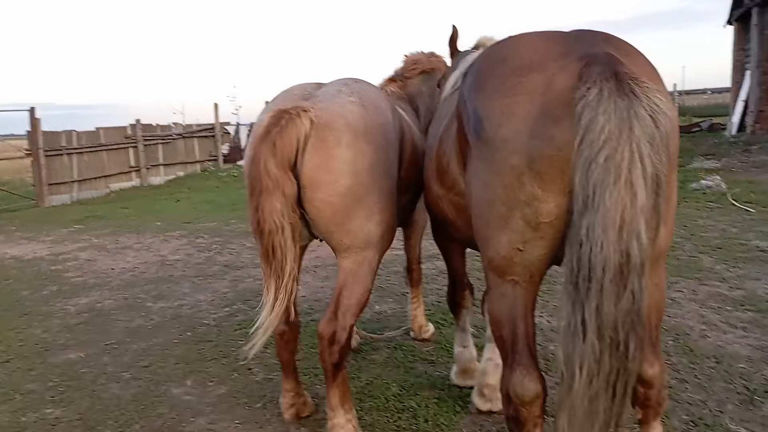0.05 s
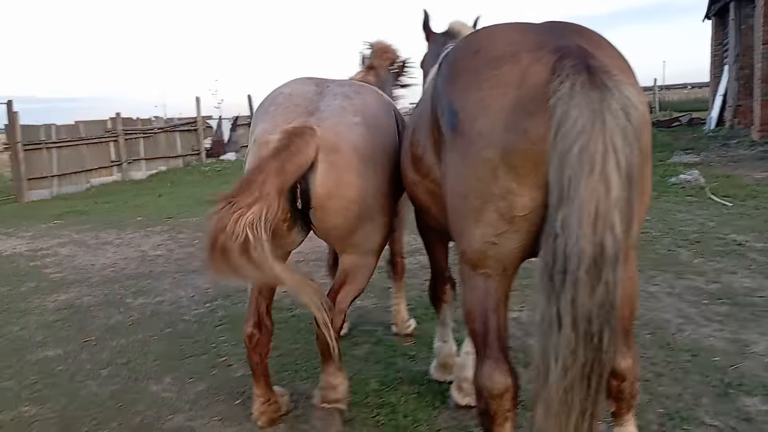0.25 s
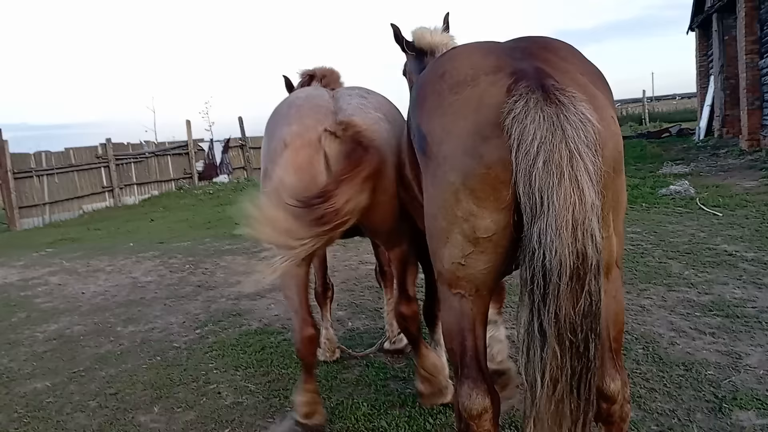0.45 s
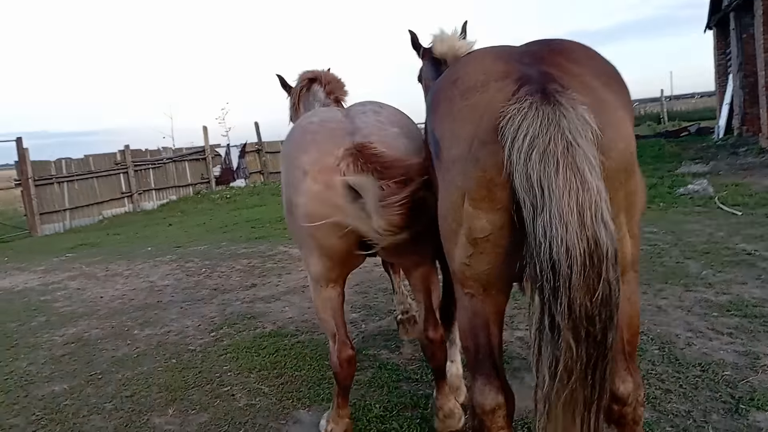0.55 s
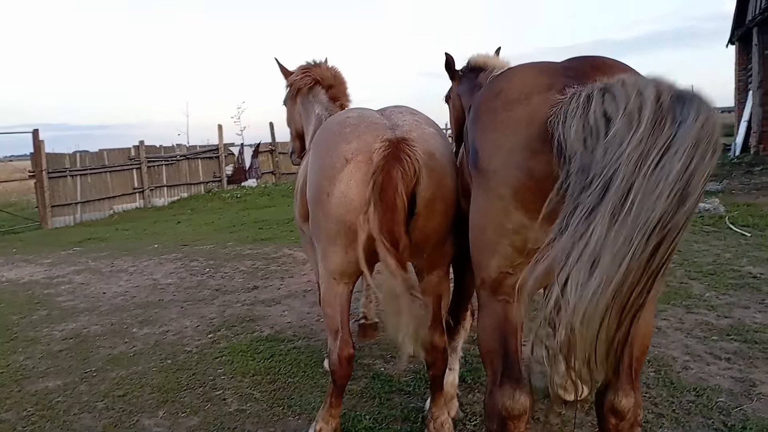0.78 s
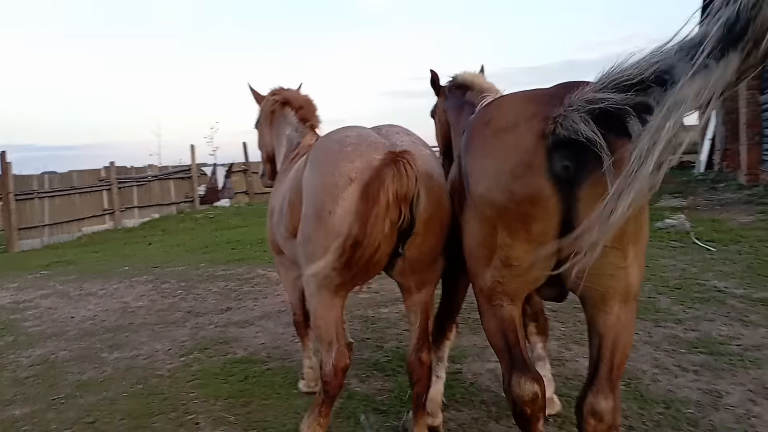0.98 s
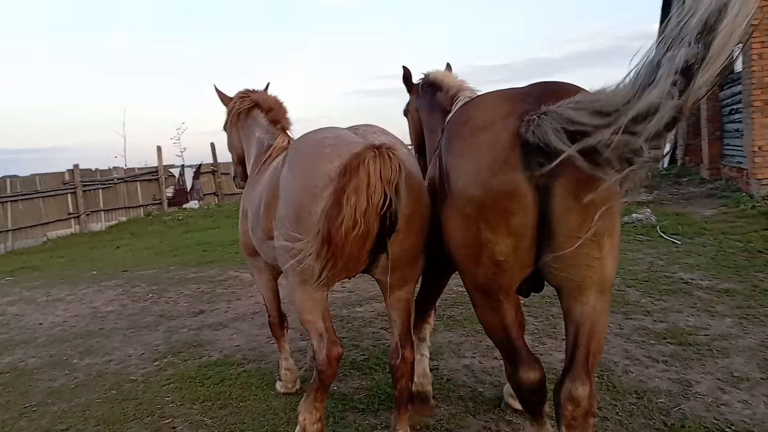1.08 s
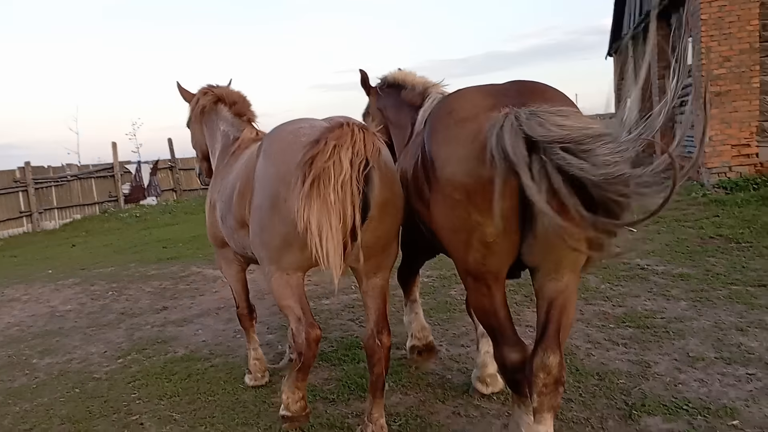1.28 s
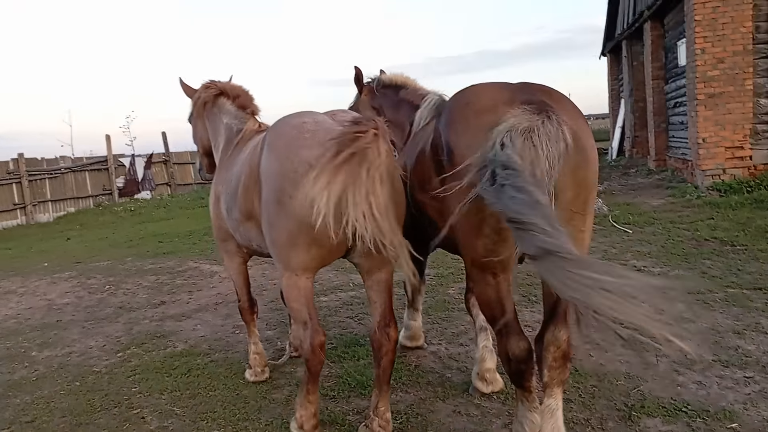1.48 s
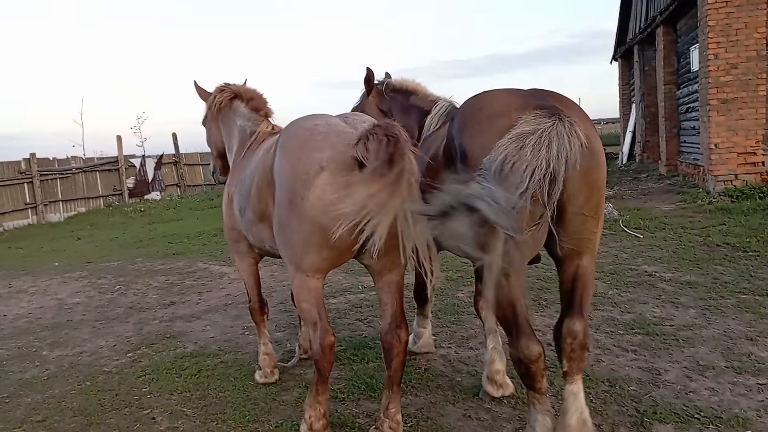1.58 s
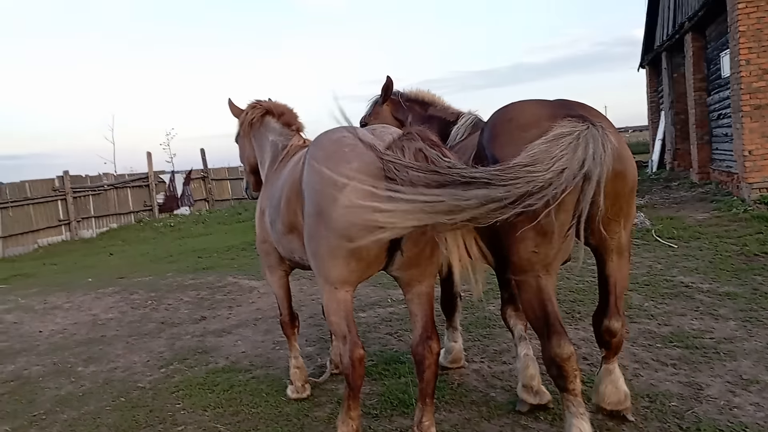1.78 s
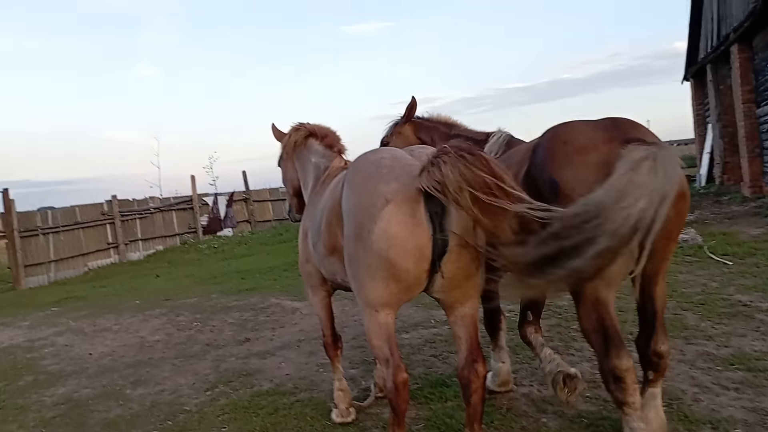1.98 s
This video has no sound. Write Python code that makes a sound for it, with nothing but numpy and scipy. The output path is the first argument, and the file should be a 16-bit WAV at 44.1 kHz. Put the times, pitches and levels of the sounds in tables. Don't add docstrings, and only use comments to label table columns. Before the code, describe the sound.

A horse squeals from about 0.12 to 0.7 seconds: a muffled whimper opens into a clear cry, loudest near 0.35 with a short growl, then jumps higher around 0.5 and breaks off, echoing from the right. Dull hooves thud on turf at 0.3-0.7, twigs tick near 0.85, a faint sigh falls at 0.9. Then quiet rumble, thin rustles near 1.5, soft steps at 1.6 and 2.0.

```python
import sys
import numpy as np
from scipy import signal
from scipy.fft import rfft, irfft
from scipy.io import wavfile

SR = 44100
rng = np.random.default_rng(int(sys.argv[2]) if len(sys.argv) > 2 else 0)


def dump_mix(stems):
    frames = np.atleast_2d(stems).T
    limited = np.clip(frames, -1, 1)
    pcm = np.round(limited * 32767).astype(np.int16)
    wavfile.write(sys.argv[1], SR, pcm)


def natural_amplitude(level_db):
    exponent = np.asarray(level_db, float) / 20
    return 10 ** exponent


N = 90404

# frequency in Hz, density in dB per Hz.
COUNTRY_RUMBLE = [(18, -58), (30, -9.5), (87, -1.5), (173, -8.5), (209, -7.5), (410, -22.5), (450, -10),
                  (985, -19.5), (2000, -25), (2500, -40.5), (5720, -120)]
# frequency in Hz, density in dB per Hz.
TREBLE_AIR = [(2400, -8), (3500, -8), (6500, -16.5), (8000, -7.5), (10500, -6), (12000, -20), (15700, -11)]
# frequency in Hz, width in Hz, level in dB.
FARM_DRONES = [(100, 73, -58), (207.8, 27.6, -58.5), (405.3, 28, -64.5), (523, 95, -61.5)]
# delay in seconds, level in dB, left-right difference in dB.
WALL_ECHOES = [
    (.088, 5, -11),
    (.06, -9, -5),
    (.172, -21, -8),
]
# start in seconds, rise in seconds, fall in seconds, level in dB,
# crisp top relative to level in dB.
RUSTLES = [(0.024, 0.0056, 0.0043, -64.5, -15), (.08, 0.0052, 0.25, -69.5, -2),
           (.21, 0.024, 0.026, -56.5, -8), (0.294, 0.029, 0.11, -48, -34), (0.576, 0.02, 0.015, -51, -21),
           (0.671, 0.028, 0.028, -61, -7), (0.74, 0.012, 0.012, -62, 1), (.78, 0.0082, 0.057, -66.5, -18),
           (0.92, 0.0036, .006, -63.5, -20), (0.986, 0.01, 0.013, -64.5, -8),
           (1.067, 0.033, 0.038, -64.5, 0), (1.207, 0.0043, 0.084, -67, 16), (1.475, .02, 0.01, -65.5, 25),
           (1.5, 0.093, 0.1, -64, 18), (1.585, 0.02, 0.014, -65, 17), (1.78, 0.07, 0.031, -71, 2),
           (2.001, 0.029, 0.012, -65, -8)]
# frequency in Hz, density in dB per Hz.
RUSTLE_BODY = [(2600, -10.5), (4000, -7.5), (6800, -19.5), (8000, -6), (10500, -3.5), (11800, -28),
               (15700, -37)]
# frequency in Hz, density in dB per Hz.
RUSTLE_TOP = [(5000, -18), (11500, -8), (13500, -22.5), (15700, -21)]
# start in seconds, level in dB, frequency in Hz.
TWIGS = [
    (1, -46.5, 680),
    (.8435, -49, 2200),
    (0.845, -41, 2000),
    (0.919, -57, 4500),
]
# start in seconds, peak in dB, ground ring in Hz, knock relative to thud in dB,
# knock in Hz.
HOOF_FALLS = [(0.294, -22.5, 105.7, 3.5, 128), (0.366, -29.5, 109.5, -1, 183),
              (0.552, -25.5, 90, -0.5, 166.9), (.572, -25.5, 105, 9, 130), (0.688, -33.5, 82, -3.5, 200),
              (0.89, -38.5, 100, -4, 185), (1.601, -38.5, 97.5, -12, 200), (2.001, -31, 101, 10, 163),
              (0.234, -31.5, 85, -12, 150), (.81, -53.5, 142, 11, 258), (.008, -36.5, 75.4, -11, 190)]
# time in seconds, pitch in Hz, level in dB, roughness from 0 to 1,
# mouth brightness (third partial) in dB.
LOW = [
    (.125, 505, -47, 0.5, -2),
    (.165, 562.8, -42.5, 0.47, -11),
    (.225, 634, -35, 0.16, -10.5),
    (.258, 653.4, -34, 0.07, -2),
    (.275, 636.2, -29.5, 0.02, -16.5),
    (.372, 652.7, -28, 0.04, -0.5),
    (.415, 602, -32, 0.11, -10.5),
    (.525, 615, -40, 0.3, -0.5),
    (.635, 629.7, -44.5, 0.6, -2.5),
]
# time in seconds, pitch in Hz, level in dB, first partial relative to throat in dB.
HIGH = [
    (.42, 742, -54.5, 26),
    (.48, 813, -44, 5),
    (.525, 845, -35, 1),
    (.565, 862.7, -35, -0.5),
    (.6, 845, -48, -8.5),
    (.635, 847.2, -43.5, -13),
    (.675, 883.4, -45, 3),
    (.7, 900, -51.5, -41),
    (.715, 910, -100, -14),
]
LOW_PARTS_DB = {3.5: -9, 4: -10, 4.5: -8, 5: 10, 5.5: 2, 6: 5, 6.5: -2, 7: 16, 7.5: 1, 8: 1, 8.5: 3, 9: 4}
# frequency in Hz, gain in dB.
THROAT = [(500, -17.5), (700, -7), (1280, -1), (1550, -2), (1800, 7.5), (2000, 7), (2500, -18), (9000, -39)]
# frequency in Hz, width in Hz, level in dB.
GROWL_RING = [(549, 27, -14.5), (598, 61, -6.5), (687.7, 17.3, -0.5), (1310, 39, -7)]
# frequency in Hz, density in dB per Hz.
HISS = [(300, -7.5), (700, -1.5), (1100, -20), (1900, 3.5), (2600, -8.5), (5000, -17.5), (9500, -28.5),
        (15000, -40)]
# time in seconds, frequency in Hz, level in dB.
CHIRP = [(.1, 773, -64), (.12, 926, -47), (.135, 989, -51), (.155, 730, -49)]
# time in seconds, frequency in Hz, level in dB.
SIGH = [(.86, 662, -62), (.9, 590, -56), (.93, 547, -55), (.99, 497.5, -60), (1.02, 490, -62)]
# time in seconds, frequency in Hz, level in dB.
MOAN = [(0, 403.3, -67), (.09, 402.3, -49.5), (.15, 406, -61), (.26, 404, -53)]
# time in seconds, half length in seconds,
# depth in dB.
LEVEL_DIPS = [
    (0.281, 0.011, -4.5),
    (.393, 0.0021, -0.5),
    (0.549, 0.021, -5),
    (.672, .003, -8),
    (0.699, 0.0033, -10.5),
    (0.777, 0.0076, -9.5),
]
# frequency in Hz, left-right difference in dB.
LOW_PAN = [(300, 2.5), (700, -2.5), (1300, -2), (1900, -8), (2600, -3), (3300, -5), (4500, 1)]
# frequency in Hz, left-right difference in dB.
HIGH_PAN = [(300, -9), (850, -7), (1700, -2), (3500, -11)]


def clock():
    return np.arange(N) / SR


def col(table, order, t):
    return np.interp(t, np.array(table)[:, 0], np.array(table)[:, order])


def tone_db(table, hz):
    return np.interp(np.log(np.maximum(hz, 1)), np.log(np.array(table)[:, 0]), np.array(table)[:, 1])


def ramp(t, start_s, per_s):
    return np.clip((t - start_s) * per_s, 0, 1)


def unit(x):
    return x / np.sqrt(np.mean(x ** 2))


def noise(table, size=()):
    hz = np.fft.rfftfreq(N, 1 / SR)
    inside = (hz > table[0][0]) & (hz < table[-1][0])
    white = rng.standard_normal(size + (N,))
    return unit(irfft(rfft(white) * natural_amplitude(tone_db(table, hz)) * inside, N))


def walk(rate_hz):
    low_pass = signal.butter(2, rate_hz, fs=SR, output="sos")
    return unit(signal.sosfilt(low_pass, rng.standard_normal(N)))


def ring(x, hz, width_hz):
    return signal.lfilter(*signal.iirpeak(hz, hz / width_hz, fs=SR), x)


def double_ring(x, hz, width_hz):
    return ring(ring(x, hz, 2 * width_hz), hz, width_hz)


def late(x, delay_s, shape=((100, 0), (200, 0)), share=0):
    hz = np.fft.rfftfreq(2 * N, 1 / SR)
    spectrum = rfft(x, 2 * N) * natural_amplitude(share * tone_db(shape, hz))
    return irfft(spectrum * np.exp(-2j * np.pi * hz * delay_s))[:N]


def place(x, pan):
    lag_s = -0.00015
    return np.array([late(x, lag_s / 2, pan, 0.51), late(x, -lag_s / 2, pan, -0.88)])


def wide(mid, side):
    high_pass = signal.butter(1, 1620, "high", fs=SR, output="sos")
    side = signal.sosfilt(high_pass, side) + natural_amplitude(-18) * side
    return np.array([mid + side, mid - side])


def drones():
    out = 0
    for hz, width_hz, db in FARM_DRONES:
        out = out + natural_amplitude(db + 0.56 * walk(39)) * unit(double_ring(rng.standard_normal(N), hz, width_hz))
    return out


def country():
    far = natural_amplitude(-52.5 + 0.74 * walk(1.1)) * wide(noise(COUNTRY_RUMBLE), noise(COUNTRY_RUMBLE))
    hum = wide(drones(), drones()) * natural_amplitude([[-.6], [.6]])
    return far + hum + natural_amplitude(-68 + walk(7.6)) * noise(TREBLE_AIR, size=(2,))


def yard(voice):
    t60_s, level_db = .55, -12.5
    t = clock()[:N // 2]
    tail = rng.standard_normal((2, N // 2)) * natural_amplitude(-60 * t / t60_s) * (t > .01)
    tail = tail / np.sqrt(np.sum(tail[0] ** 2))
    return natural_amplitude(level_db) * signal.fftconvolve(voice[None], tail, axes=1)[:, :N]


def barn_wall(bright):
    low_pass = signal.butter(3, 2500, fs=SR, output="sos")
    dull = signal.sosfilt(low_pass, bright) * natural_amplitude(-2.26)
    echoes = 0
    for delay_s, db, pan_db in WALL_ECHOES:
        echoes = echoes + natural_amplitude(db) * late(dull, delay_s) * natural_amplitude(np.array([[pan_db], [-pan_db]]) / 2)
    return np.array([late(echoes[0], 0.0001), echoes[1]])


def rustle_swell(t, top_share):
    power = 0
    for start_s, rise_s, fall_s, db, top_db in RUSTLES:
        spread_s = np.where(t < start_s, rise_s, fall_s)
        power = power + natural_amplitude(db + top_share * top_db) ** 2 * np.exp(-((t - start_s) / spread_s) ** 2)
    return np.sqrt(power)


def twigs(t):
    out = 0
    for start_s, db, hz in TWIGS:
        fade = (t > start_s) * np.exp(-np.maximum(t - start_s, 0) / 0.00075)
        out = out + 3 * natural_amplitude(db) * fade * ring(ring(rng.standard_normal(N), hz, 1900), hz, 3300)
    return out


def rustle(t):
    body = rustle_swell(t, 0) * noise(RUSTLE_BODY, size=(2,)) * natural_amplitude(1.7 * walk(220))
    crisp = rustle_swell(t, 0.19) * noise(RUSTLE_TOP, size=(2,)) * natural_amplitude(1.8 * walk(220))
    return body + crisp + twigs(t)


def hooves(t):
    glide, glide_s = 0.78, 0.0018
    out = 0
    for start_s, db, hz, knock_db, knock_hz in HOOF_FALLS:
        u = np.maximum(t - start_s, 0)
        v = u + glide * glide_s * (1 - np.exp(-u / glide_s))
        thud_fade = natural_amplitude(-60 * u / 0.097) * (1 - np.exp(-u / 0.0028))
        knock_fade = natural_amplitude(-60 * u / .026) * (1 - np.exp(-u / .0016))
        knock = np.sin(2 * np.pi * knock_hz * v) + 0.28 * np.sin(2 * np.pi * 2.7 * knock_hz * v)
        out = out - natural_amplitude(db) * (thud_fade * np.sin(2 * np.pi * hz * u) + natural_amplitude(knock_db) * knock_fade * knock)
    return wide(out, late(out, 0.003))


def whistle(table, t, overtone_db=-60):
    edge = np.clip(np.minimum(t - table[0][0], table[-1][0] - t) * 200, 0, 1)
    phase = 2 * np.pi * np.cumsum(col(table, 1, t)) / SR
    tone = np.sin(phase) + natural_amplitude(overtone_db) * (np.sin(2 * phase) + np.sin(3 * phase) / 2)
    return natural_amplitude(col(table, 2, t) + 3.2 * walk(26)) * edge * tone


def folds(hz, rough, extra_db):
    rough_hz = 80
    hz = hz * (1 + 0.007 * walk(37.8))
    phase = 2 * np.pi * np.cumsum(hz) / SR
    out = 0
    for k, db in extra_db.items():
        blur = rough + 0.1 * max(k - 3, 0)
        beat_share = 1 if k > 3 and k != 7 else .45
        beat_db = np.minimum(4.5 * beat_share * walk(14.1), 5)
        level = natural_amplitude(tone_db(THROAT, k * hz) + db + beat_db)
        steady_power = np.sqrt(2 / (1 + 2 * blur ** 2))
        in_phase = np.sin(k * phase) * (1 + blur * walk(rough_hz))
        quadrature = blur * walk(rough_hz) * np.cos(k * phase)
        out = out + level * steady_power * (in_phase + quadrature)
    return out


def growl_pulses():
    rate_hz, jitter, scatter_db = 105, .28, 2.5
    cycles = np.cumsum(rate_hz * np.maximum(1 + jitter * walk(30.29), .2)) / SR
    return cycles, np.diff(np.floor(cycles), prepend=0) * natural_amplitude(scatter_db * walk(60))


def growl(pulses):
    return unit(sum(natural_amplitude(db) * double_ring(pulses, hz, width_hz) for hz, width_hz, db in GROWL_RING))


def low_voice(t, rough, cycles, growl_gate, shut_db):
    parts = {
        1: -11 * ramp(t, 0.457, 25) + 4 * growl_gate,
        2: 0,
        3: col(LOW, 4, t),
    }
    for k, db in LOW_PARTS_DB.items():
        parts[k] = db + shut_db
    growl_s, nasal_hz, nasal_width_hz = 0.3077, 4500, 75
    parts[4] = parts[4] + 14 * np.clip((t - growl_s - .1) * 25, 0, 1)
    parts[7] = parts[7] - np.minimum(6 * ((7 * col(LOW, 1, t) - nasal_hz) / nasal_width_hz) ** 2, 30)
    flutter = 1 + np.minimum(2 * rough, .5) * np.cos(2 * np.pi * cycles)
    return flutter * folds(col(LOW, 1, t), 1.64 * rough, parts)


def high_voice(t):
    fourth_db = 14 - np.clip((.615 - t) * 300, 0, 18) - np.clip((t - .655) * 400, 0, 14)
    return folds(col(HIGH, 1, t), .2, {1: col(HIGH, 3, t), 2: 0, 3: -14, 4: fourth_db})


def squeal(t):
    low = natural_amplitude(col(LOW, 2, t)) * np.clip((LOW[-1][0] - t) * 50, 0, 1) * ramp(t, LOW[0][0], 50)
    high = natural_amplitude(col(HIGH, 2, t)) * ramp(t, HIGH[0][0], 100) * (t < HIGH[-1][0])
    shut_db = -14 * np.clip((.175 - t) * 18, 0, 1)
    rough = np.clip(col(LOW, 3, t), 0, 1)
    growl_s, growl_len_s, growl_rise_s = 0.3077, 0.16, .035
    gate = np.clip(np.minimum(t - growl_s, (growl_s + growl_len_s - t) / 2) / growl_rise_s, 0, 1)
    cycles, pulses = growl_pulses()
    hiss = natural_amplitude(-12.5 + 1.6 * walk(53)) * noise(HISS)
    first = low * low_voice(t, rough, cycles, gate, shut_db)
    first = first + natural_amplitude(-26) * gate * growl(pulses)
    first = first + low * (0.88 + 8.2 * rough) * natural_amplitude(shut_db) * hiss
    first = first + whistle(SIGH, t) + whistle(CHIRP, t, overtone_db=-4) + whistle(MOAN, t)
    second = high * high_voice(t) + 0.57 * high * hiss
    return first, second


def scene():
    t = clock()
    first, second = squeal(t)
    high_pass = signal.butter(6, 1547, "high", fs=SR, output="sos")
    bright = signal.sosfilt(high_pass, natural_amplitude(-14) * first + second)
    direct = place(first, LOW_PAN) + place(second, HIGH_PAN)
    dip_gain = natural_amplitude(sum(db * np.exp(-((t - s) / half_s) ** 2) for s, half_s, db in LEVEL_DIPS))
    voice = dip_gain * (direct + barn_wall(bright))
    return voice + yard(first + bright) + hooves(t) + rustle(t) + country()


def band_limit(x):
    return signal.sosfilt(signal.butter(12, 15700, fs=SR, output="sos"), x)


def record(dry):
    bass_cut = signal.butter(3, 71.4, "high", fs=SR, output="sos")
    top_cut = signal.ellip(8, .2, 70, 15750, fs=SR, output="sos")
    mix = signal.sosfilt(np.vstack([bass_cut, top_cut]), dry)
    return band_limit(mix)


dry = scene()
out = record(dry)
dump_mix(out)
```